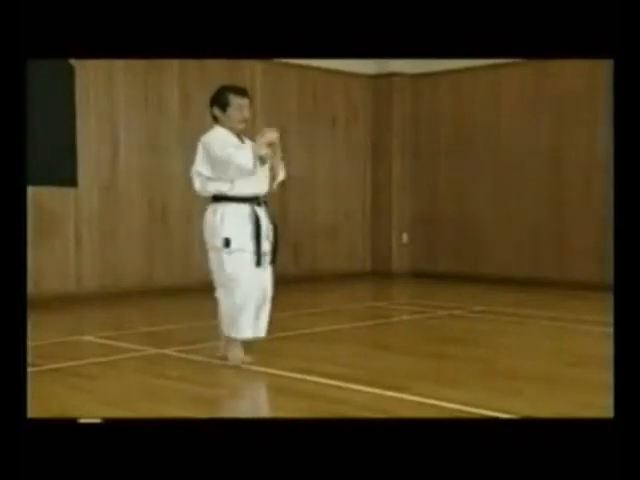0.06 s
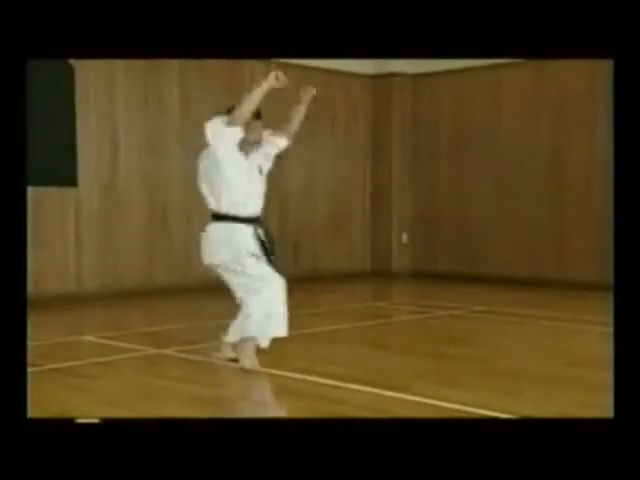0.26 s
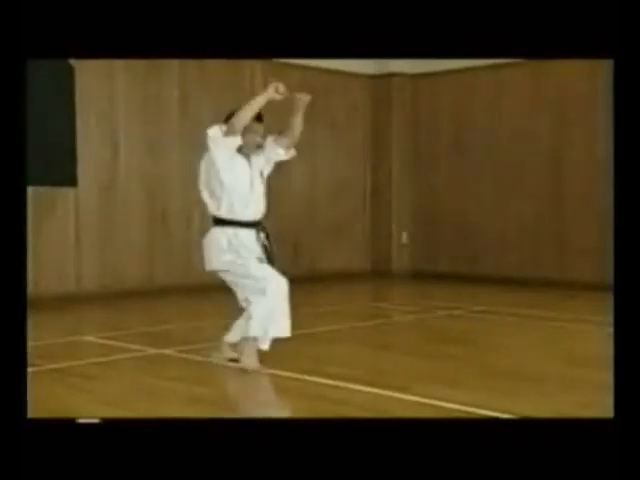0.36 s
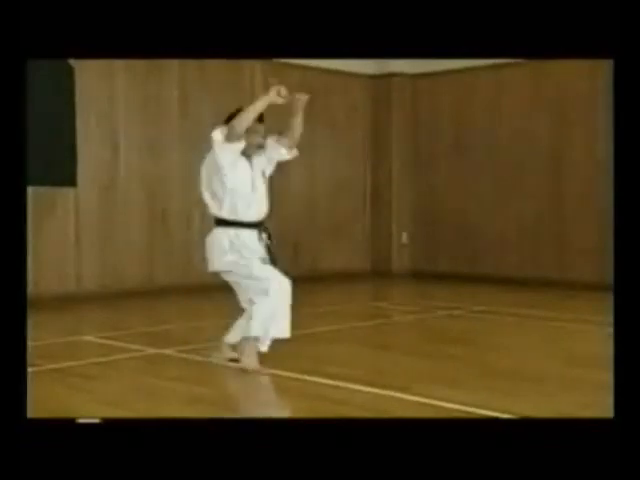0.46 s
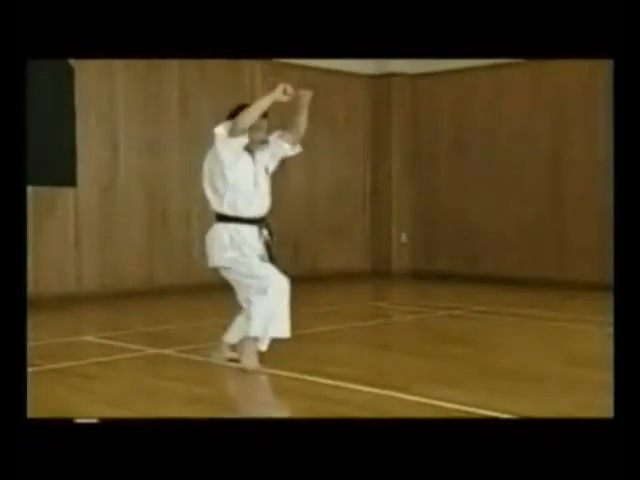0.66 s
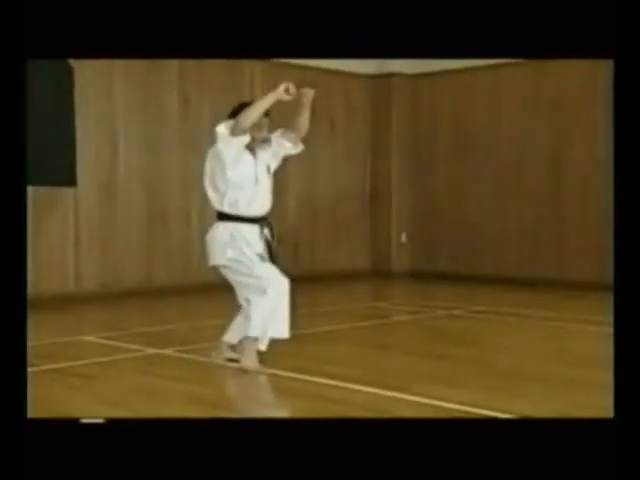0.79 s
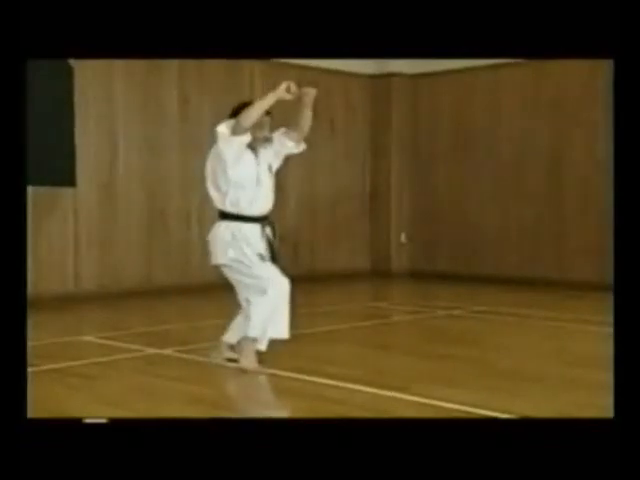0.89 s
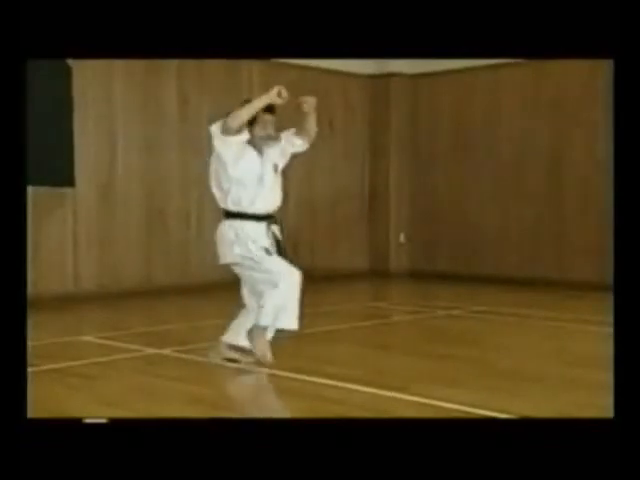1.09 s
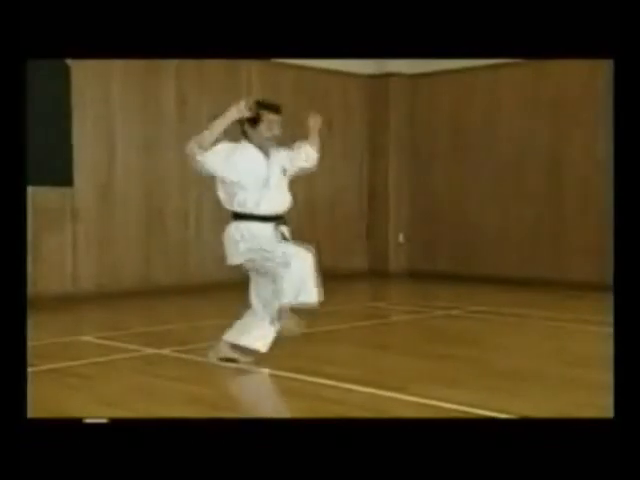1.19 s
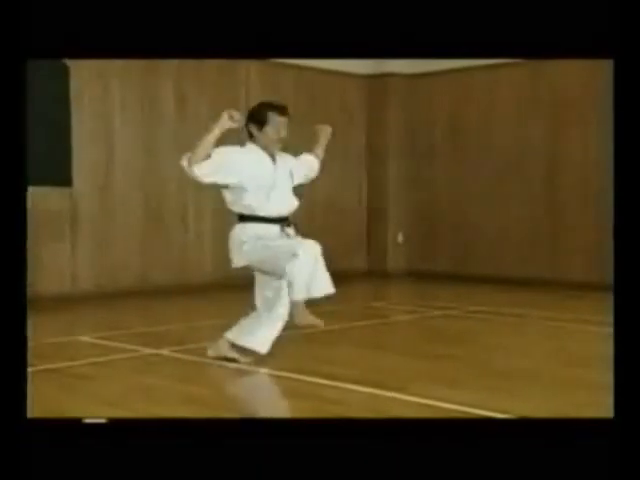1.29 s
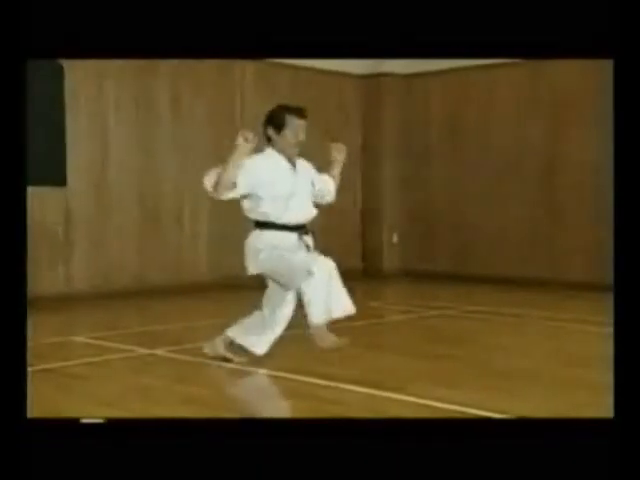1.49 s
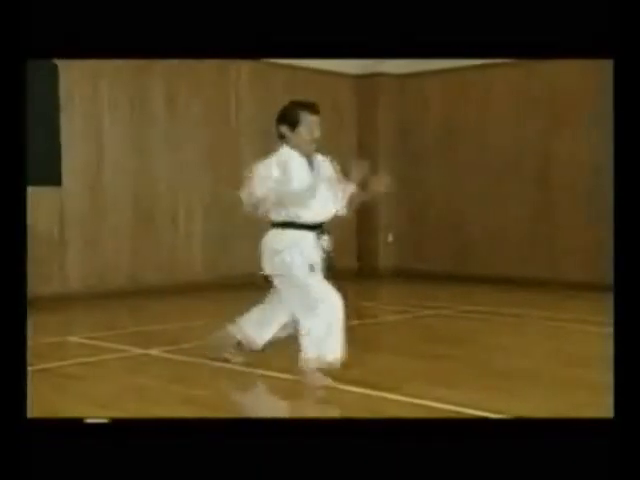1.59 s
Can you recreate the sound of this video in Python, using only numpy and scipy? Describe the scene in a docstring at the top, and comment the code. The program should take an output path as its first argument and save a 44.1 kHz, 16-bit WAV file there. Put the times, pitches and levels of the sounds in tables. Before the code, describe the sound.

A bare foot stamps once on a sprung wooden floor, just after a quick sleeve swish and together with a sharp snap of stiff cotton. The thump echoes through a large gym, then a soft rustling step follows.

```python
"""A martial artist in a stiff cotton uniform, in a gym, over faint room air, hiss and hum.
He throws up his arms: the cloth swishes by friction and its loose folds flap. At 0.3 s he stamps,
and the sprung wooden floor thumps and rings. Just after the thump the uniform snaps taut and the
sleeves whip. The hall echoes floor and cloth as his weight shifts. From about 1.1 s he steps forward
with a soft rustle and light taps of the foot."""
import sys
import numpy as np
from scipy import signal
from scipy.fft import rfft, irfft
from scipy.io import wavfile

SR = 44100
rng = np.random.default_rng(int(sys.argv[2]) if len(sys.argv) > 2 else 0)


def transcribe(signal):
    """Save signal, clipped to [-1, 1], as a 16-bit WAV file at the path in sys.argv[1]."""
    frames = np.atleast_2d(signal).T
    limited = np.clip(frames, -1, 1)
    pcm = np.round(limited * 32767).astype(np.int16)
    wavfile.write(sys.argv[1], SR, pcm)


N = 72765

# room air and hiss: (frequency [Hz], relative spectral density [dB])
AIR_SPECTRUM = [(25, 0), (60, 1.5), (130, -5.5), (200, -2), (320, -4), (600, -10.5), (1200, -13.5),
                (2500, -10.5), (5000, -15.5), (8000, -20.5), (11000, -20.5)]
# electrical hum: (frequency [Hz], rms level [dB])
HUM_TONES = [(120, -70), (310, -70)]
# reverberation of the gym: (frequency [Hz], time to decay by 60 dB [s])
HALL_T60 = [(50, 1.26), (120, 1.15), (250, 1.24), (550, 1.596), (1200, 1.7), (2200, 1.27), (4000, 1),
            (6000, 0.74), (9000, 0.056)]
# swings of the limbs: (start [s], rise [s], hold [s], release [s], level [dB], tilt [dB/octave])
LIMB_SWINGS = [(0.074, 0.025, 0.081, 0.021, -49.5, 1), (0.192, 0.038, 0.073, 0.009, -36, 1),
               (1.065, 0.19, 0.098, 0.074, -58, 4.5), (1.30, 0.021, 0.04, .028, -56, 2.5),
               (1.425, 0.018, 0.034, 0.12, -62, 4), (1.602, 0.036, 0.058, 0.038, -54.5, 2.5)]
# rubbing cotton: (frequency [Hz], relative spectral density [dB])
RUB_SPECTRUM = [(40, -30), (90, 3), (180, -2.5), (350, -3), (560, 3), (760, 0), (930, -6.5), (1150, -8),
                (2000, -12), (4500, -18), (8000, -24.5), (11000, -35)]
# loose folds flapping: (time [s], level [dB], pitch [Hz], half width [s])
FOLD_FLAPS = [(0.078, -43.5, 340, 0.0019), (0.112, -38.5, 450, 0.0011), (0.1968, -38.5, 460, 0.0021),
              (0.2316, -35.5, 1170, 0.00094), (0.233, -33.5, 730, 0.0023), (.2715, -27.5, 522, 0.0014),
              (0.282, -27, 663, 0.0013), (.3145, -29.5, 567, 0.00057), (1.5884, -47, 488, 0.00068),
              (1.5983, -53, 497, .001), (1.616, -40.5, 547, 0.002)]
# weight shifting on the sprung floor: (time [s], level [dB])
WEIGHT_SHIFTS = [(0.108, -50), (0.17, -49), (0.205, -52), (0.261, -39), (.808, -43), (0.949, -47),
                 (1.341, -53.5), (1.506, -60)]
# low modes of the floor: (frequency [Hz], level [dB], time to decay by 60 dB [s])
FLOOR_MODES = [(73.5, -39.5, 1.5), (86.5, -54, 0.67), (101.2, -44, 0.87), (115.6, -41.5, 1.06),
               (131.3, -38.5, 1.05), (144.1, -34.5, 0.72)]
# reflections of the stamp from the walls: (delay [s], gain [dB])
WALL_ECHOES = [(0.061, -13), (0.1075, -8.5), (0.1319, -10), (.229, -18.5), (.257, -15), (.33, -16.5)]
# what the floor radiates into the hall: (frequency [Hz], gain [dB])
FLOOR_RADIATION = [(25, -36), (45, -5.5), (65, -2.5), (85, -4.5), (105, -7), (125, -1), (142, 5.5),
                   (165, 9.5), (220, 6)]
# the uniform snapping taut: (frequency [Hz], relative spectral density [dB])
SNAP_SPECTRUM = [(100, -23), (200, -16.5), (280, 0), (320, 3), (420, -4.5), (540, 2.5), (750, -1.5),
                 (950, -0.5), (1350, -1.5), (1900, -5.5), (3200, -9.5), (6000, -13.5), (9000, -84)]
# the sleeves whipping: (frequency [Hz], relative spectral density [dB])
WHIP_SPECTRUM = [(500, 2.5), (1500, 5.5), (2900, 4), (4500, -0.5), (6500, -1), (8000, -6), (9300, -22.5),
                 (11000, -61)]
# sharp cracks of seams and cuffs: (time [s], level [dB])
SEAM_CRACKS = [(0.311, -46), (0.325, -29.5), (0.3422, -29.5), (0.3533, -29), (0.3665, -30.5),
               (0.385, -28.5)]
# modes of the slapped floorboards: (frequency [Hz], level [dB], time to decay by 60 dB [s])
BOARD_MODES = [(452, -58, 1.5), (540.6, -36, 1.29), (631, -42.5, 1.53), (769, -43, 1.14),
               (953, -39.5, 0.21), (1135, -30.5, 0.085), (1460, -39.5, 1)]
# the foot tapping as it steps forward: (time [s], level [dB], pitch [Hz], half width [s])
FOOT_TAPS = [(1.329, -46.5, 606, 0.00039), (1.356, -42, 1040, 0.00051), (1.378, -52, 566, 0.0013)]

TIME = np.arange(N) / SR
BIN_HZ = np.fft.rfftfreq(N, 1 / SR)


def amp(db):
    """Amplitude grows tenfold for every 20 dB."""
    return 10 ** (np.asarray(db) / 20)


def unit_rms(x):
    """Normalisation to a mean power of 1."""
    return x / np.sqrt(np.mean(x ** 2) + 1e-20)


def curve_at(points, hz):
    """Interpolation of a table on a logarithmic frequency axis."""
    frequencies, values = np.transpose(points)
    return np.interp(np.log(hz + 1), np.log(frequencies), values)


def colour(x, spectrum, tilt=0):
    """Spectral shaping to rms 1, with a tilt in dB per octave about 1 kHz."""
    gain_db = curve_at(spectrum, BIN_HZ) + tilt * np.log2((BIN_HZ + 20) / 1000)
    return unit_rms(irfft(rfft(x) * amp(gain_db), N))


def envelope(start, rise, hold, release):
    """Linear rise, plateau and exponential decay, all timed in seconds."""
    t = TIME - start
    return np.clip(t / rise, 0, 1) * np.exp(-np.maximum(t - rise - hold, 0) / release)


def pulse(at, hz, width):
    """A soft blow as a Gaussian wave packet: a swing or two of pressure with no ring."""
    t = TIME - at
    return np.exp(-0.5 * (t / width) ** 2) * np.cos(2 * np.pi * hz * t)


def hall(x, gap_s=0.0056, build_s=0.067):
    """Diffuse reverberation: dense reflections build up, then each band decays at its own rate."""
    hz, age, bands = signal.stft(rng.standard_normal(N), SR, nperseg=1024)
    phases = bands / (abs(bands) + 1e-12)
    decay = amp(-60 * age / curve_at(HALL_T60, hz)[:, None])
    tail = signal.istft(phases * decay, SR, nperseg=1024)[1][:N]
    tail *= np.clip((TIME - gap_s) / build_s, 0, 1)
    low_band = abs(rfft(tail))[BIN_HZ < 2000]
    tail /= np.sqrt(np.mean(low_band ** 2))  # unit power gain below 2 kHz
    return signal.fftconvolve(x, tail)[:N]


def moving_hall(x, cycle_s=0.024, paths=4):
    """A moving source excites ever different reflections, so it feeds several tails in turn."""
    feeds = np.array([np.maximum(np.cos(2 * np.pi * (TIME / cycle_s - k / paths)), 0)
                      for k in range(paths)])
    feeds /= np.sqrt((feeds ** 2).sum(0))  # constant total power
    return sum(hall(x * feed) for feed in feeds)


def background():
    """Stationary noise: broadband room air and hiss superposed on tones of electrical hum."""
    hum = sum(amp(db) * np.sqrt(2) * np.sin(2 * np.pi * (hz * TIME + rng.random()))
              for hz, db in HUM_TONES)
    return amp(-61) * colour(rng.standard_normal(N), AIR_SPECTRUM) + hum


def cotton(spectrum, tilt=0, creases_per_s=3500, spread_db=2.5, rub_share=0.57):
    """Friction noise: tiny creases pop as random impulses over the smooth rub of the weave."""
    sizes = amp(spread_db * np.minimum(rng.exponential(1, N), 4))
    creases = sizes * rng.choice([-1, 1], N) * (rng.random(N) < creases_per_s / SR)
    rub = np.sqrt(rub_share) * rng.standard_normal(N)
    return colour(np.sqrt(1 - rub_share) * unit_rms(creases) + rub, spectrum, tilt)


def swishes():
    """Sliding friction: the cloth sounds for as long as a limb moves."""
    direct = sum(amp(db) * envelope(*timing) * cotton(RUB_SPECTRUM, tilt)
                 for *timing, db, tilt in LIMB_SWINGS)
    return direct + amp(-3.5) * moving_hall(direct)


def flaps():
    """Air displacement: each fold pushes out a pressure pulse and crackles a little."""
    direct = np.zeros(N)
    for at, db, hz, width in FOLD_FLAPS:
        crackle = envelope(at - width, rise=width, hold=0, release=2 * width) * cotton(RUB_SPECTRUM)
        direct += amp(db) * (pulse(at, hz, width) + amp(-7.5) * crackle)
    return direct + amp(4.5) * moving_hall(direct)


def treads():
    """Compliance: the sprung floor yields with a low pulse whenever the weight moves."""
    direct = sum(amp(db) * pulse(at, hz=72, width=0.0067) for at, db in WEIGHT_SHIFTS)
    return direct + amp(-7) * hall(direct)


def stamp(at=0.3045, boom_rise_s=0.014):
    """Impact excitation: a bare foot sets the floor's modes booming and the walls reflect the thump."""
    heel = amp(-27) * pulse(0.292, hz=170, width=0.0034)  # the heel touches first
    thump = amp(-16.5) * pulse(at, hz=92.6, width=0.006)  # the floor dips and springs back
    t = np.maximum(TIME - at, 0)
    modes = sum(amp(db - 60 * t / t60) * np.sin(2 * np.pi * hz * t) for hz, db, t60 in FLOOR_MODES)
    boom = np.minimum(t / boom_rise_s, 1) * modes
    echoes = sum(amp(db) * np.interp(TIME - delay, TIME, thump) for delay, db in WALL_ECHOES)
    radiated = irfft(rfft(thump) * amp(curve_at(FLOOR_RADIATION, BIN_HZ)), N)
    reverberation = hall(amp(6) * radiated + amp(-2.5) * heel)
    return heel + thump + boom + echoes + reverberation


def snap():
    """Sudden tension: the uniform snaps taut in a noise burst, then sleeves whip and seams crack."""
    taut = amp(-29.5) * envelope(0.310, rise=0.0016, hold=0.016, release=0.05) * cotton(SNAP_SPECTRUM)
    whip = amp(-31.5) * envelope(0.3232, rise=0.015, hold=0.024, release=0.016) * cotton(WHIP_SPECTRUM)
    bursts = sum(amp(db) * envelope(at, rise=0.0015, hold=0, release=0.002) for at, db in SEAM_CRACKS)
    cracks = bursts * cotton(WHIP_SPECTRUM)
    return taut + whip + cracks + moving_hall(amp(1.5) * taut + amp(-2.5) * (whip + cracks))


def boards(at=0.311, rise_s=0.0027, waver_hz=22, waver_depth=0.51):
    """Damped free vibration: boards slapped by the sole give a knock and a ring wavering in the hall."""
    t = np.maximum(TIME - at, 0)
    lowpass = np.exp(-(BIN_HZ / waver_hz) ** 2)
    ring = np.zeros(N)
    for hz, db, t60 in BOARD_MODES:
        slow_noise = irfft(rfft(rng.standard_normal((2, N))) * lowpass, N)
        swell, drift = waver_depth * unit_rms(slow_noise)  # amplitude and phase wander
        phase = 2 * np.pi * hz * t
        ring += amp(db - 60 * t / t60) * ((1 + swell) * np.sin(phase) + drift * np.cos(phase))
    return np.minimum(t / rise_s, 1) * ring


def taps():
    """Brief contact gives a broad spectrum: a bare foot touches the wood lightly."""
    direct = sum(amp(db) * pulse(at, hz, width) for at, db, hz, width in FOOT_TAPS)
    return direct + amp(-0.5) * hall(direct)


def scene():
    """Superposition: all pressures add at one microphone, the same in both channels."""
    mono = background() + swishes() + flaps() + treads() + stamp() + snap() + boards() + taps()
    return np.array([mono, mono])


def record(dry):
    """Band limiting: a linear-phase low-pass filter removes the highest treble."""
    cutoff_hz = 11050
    lowpass = signal.firwin(511, cutoff_hz, window=("kaiser", 9), fs=SR)
    return signal.oaconvolve(dry, lowpass[None], "same")


dry = scene()
out = record(dry)
transcribe(out)
```